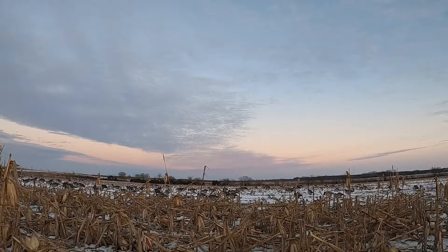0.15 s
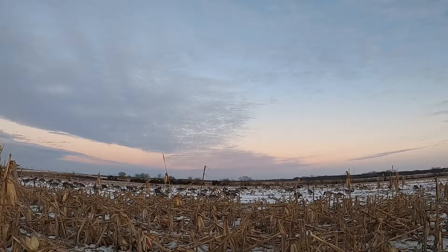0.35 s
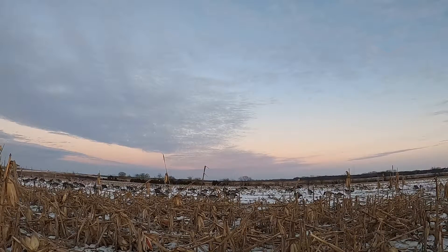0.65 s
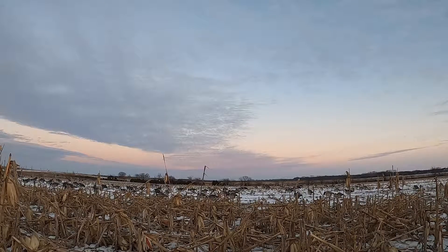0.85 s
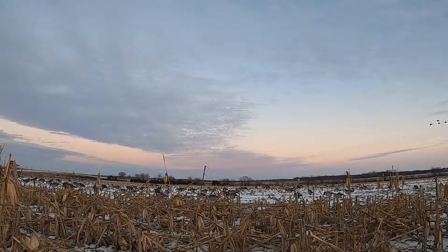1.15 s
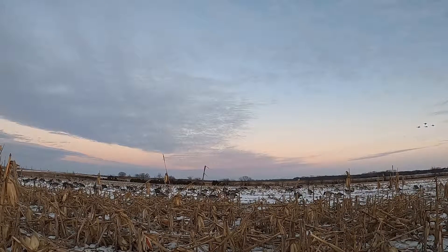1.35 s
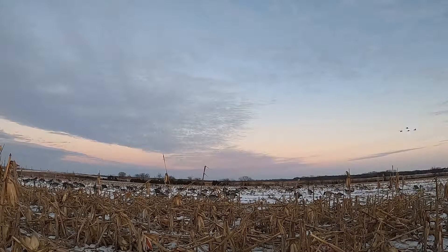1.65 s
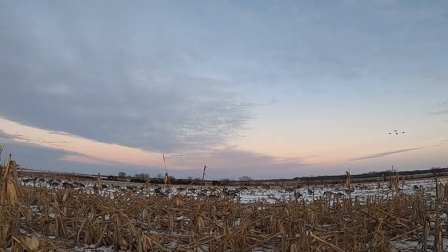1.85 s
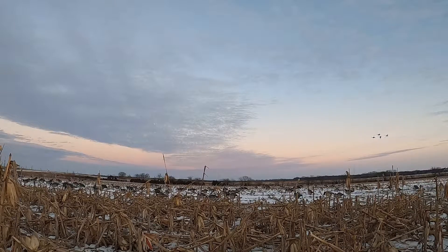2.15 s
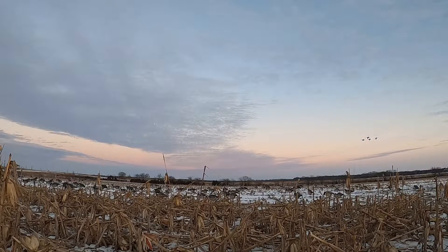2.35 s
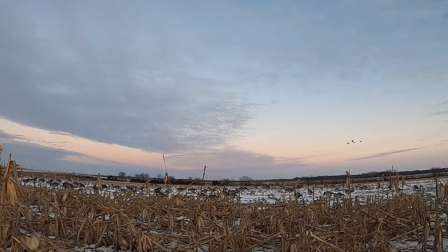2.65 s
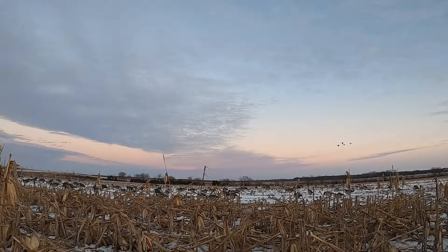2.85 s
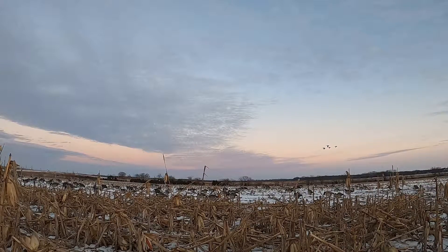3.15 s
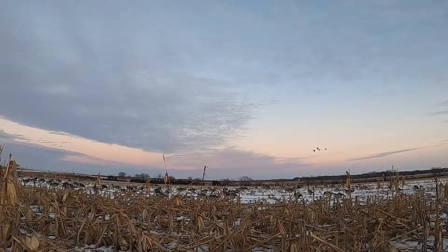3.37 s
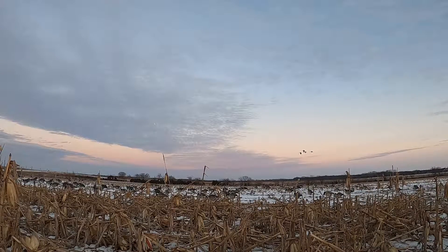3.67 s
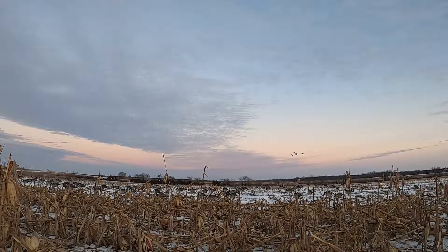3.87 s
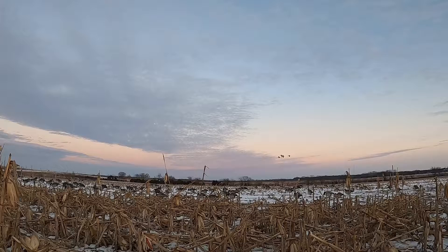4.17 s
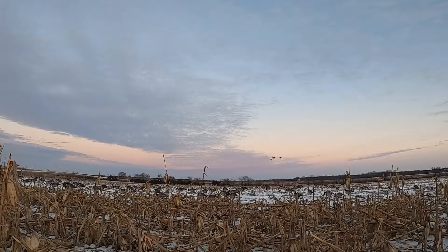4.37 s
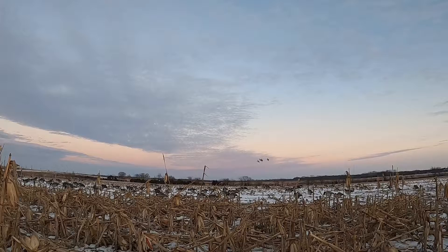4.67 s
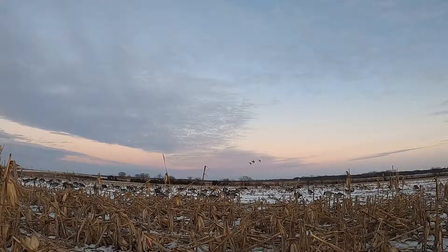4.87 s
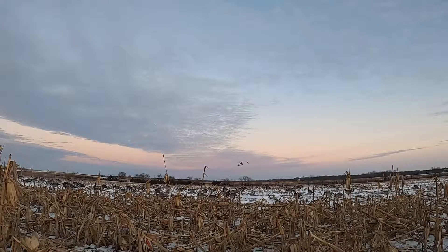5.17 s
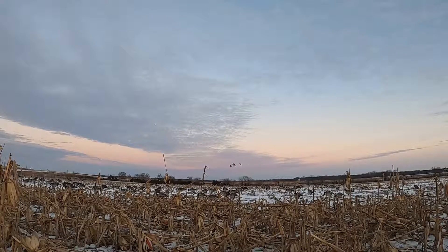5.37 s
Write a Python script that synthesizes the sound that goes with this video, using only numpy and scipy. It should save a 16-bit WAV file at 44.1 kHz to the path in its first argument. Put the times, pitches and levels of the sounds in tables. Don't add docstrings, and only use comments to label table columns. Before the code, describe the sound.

A windy stubble field with almost no reverberation, heard through a small camera's stereo microphone. Low gusts buffet throughout, with soft leaf hiss and thumping pops, mainly left, clustered around 0.3-0.7, 3.1 and 4.6-5.2 s. A distant tyre roar stays steady on the left; a very faint horn chord wavers and fades by 2 s. From 0.13 to 0.95 s a near goose, slightly left, holds a hoarse, buzzy moan, climbing slowly, loudest near 0.7, then sagging; another bird calls beneath at 0.2-0.4. A quieter gap follows, with a small stalk tick at 1.64. At 2.0 a brief growly moan leads to a dark honk at 2.1. Then chirp, rough growl and upward-breaking honk come at 2.8, 3.5, 4.1, 4.6 and 5.2, increasingly high, bright and strong, with faint murmurs between. A faint engine drones around 3.6-4.1; dry ticks sound near 2.5, 3.5 and 4.5. A short, highest honk at 5.48 is cut off by the end.

```python
import sys
import numpy as np
from scipy import signal
from scipy.fft import rfft, irfft, next_fast_len
from scipy.io import wavfile
from scipy.ndimage import uniform_filter1d, map_coordinates

SR = 44100
rng = np.random.default_rng(int(sys.argv[2]) if len(sys.argv) > 2 else 0)


def generate_wav(sig):
    pcm = np.round(np.clip(np.atleast_2d(sig).T, -1, 1) * 32767).astype(np.int16)
    wavfile.write(sys.argv[1], SR, pcm)


def voltage_ratio(decibels):
    exponent = np.asarray(decibels, float) / 20
    return 10 ** exponent


N = 243431
T = np.arange(N) / SR


def unit(x):
    return x / np.sqrt(np.mean(x ** 2) + 1e-20)


def along(points, hz):
    f, value = np.transpose(points)
    return np.interp(np.log(hz + 1), np.log(f + 1), value)


def curves(rows, t=T):
    s, *columns = np.transpose(rows)
    return [np.interp(t, s, column) for column in columns]


def wobble(rate, size=N):
    knots = rng.standard_normal(int(size * rate / SR) + 4)
    return map_coordinates(knots, [np.arange(size) * rate / SR])


def filtered(x, response):
    m = next_fast_len(N + 8192)
    return irfft(rfft(x, m) * response(np.fft.rfftfreq(m, 1 / SR)), m)[..., :N]


def rush(spectrum, alike, patchy_db):
    z = signal.stft(rng.standard_normal((2, N)), nperseg=512)[2]
    field = uniform_filter1d(rng.standard_normal(z.shape[1:]), size=5, axis=0)
    field = uniform_filter1d(field, size=10, axis=1)
    pair = signal.istft(z * voltage_ratio(patchy_db * unit(field)), nperseg=512)[1][:, :N]

    def mid_side(hz):
        turn = np.arccos(np.clip(along(alike, hz), -1, 1)) / 2
        return voltage_ratio(along(spectrum, hz)) * [np.cos(turn), np.sin(turn)]

    mid, side = filtered(pair, mid_side)
    return unit(np.array([mid + side, mid - side]))


# t/s, level/dB
GUSTS = [(0, -39), (.2, -43), (.44, -33.5), (.64, -40), (1.1, -42), (1.86, -39), (2.14, -37.5),
         (2.55, -41.5), (3.01, -37), (3.5, -42.5), (3.67, -39), (3.92, -41.5), (4.61, -40.5), (4.81, -37),
         (5, -41.5), (5.4, -38.5), (5.52, -42)]
# f/Hz, level/dB per Hz
BUFFET_SPECTRUM = [(12, -32.5), (20, 1), (39, 0), (80, -2), (251, -28), (320, -32), (420, -44), (700, -120)]
# f/Hz, left-right likeness
BUFFET_ALIKE = [(30, .32), (250, .6)]
# t/s, left peak level/dB, f/Hz, left minus right/dB, width/cycles
GUST_POPS = [(.318, -19, 67.7, 20, 0.52), (0.371, -22.5, 110, 13.5, 0.35), (0.458, -26, 110, 12.5, .4),
             (0.497, -13.5, 101, 20.5, 0.46), (.586, -23.5, 98.4, 10, 0.6), (.663, -27, 84, 19, .4),
             (1.212, -19.5, 77.6, 22, 0.48), (1.468, -29.5, 72.4, 11, 0.81), (2.64, -29, 73.8, -2, 0.65),
             (3.072, -17, 119, 11, 0.35), (3.088, -14, 102.6, 23, 0.49), (3.134, -23.5, 67.5, 14, 1),
             (3.245, -21, 69, 16, 0.45), (4.054, -22.5, 75, 14, .5), (4.634, -22.5, 70, 20, 0.54),
             (4.751, -15, 79.13, 12, 0.44), (4.763, -14, 100, 17, 0.28), (4.846, -24, 64, 9, 0.53),
             (4.963, -19, 76, 23, 0.65), (5.192, -20, 106, 16, 0.4)]
# f/Hz, level/dB per Hz
HISS_SPECTRUM = [(2500, -33.5), (4000, -1), (7500, -3.5), (8000, -10.5), (8400, -25.5), (20000, -41)]


def wind():
    buffet_db, = curves(GUSTS)
    leaves_db, leaves_swing = -84, 0.88
    rustle_db = leaves_db + leaves_swing * (buffet_db - buffet_db.mean())
    lumps = voltage_ratio(1.8 * wobble(6.01) + 2.5 * np.array([wobble(14), wobble(8.7)]))
    buffet = unit(lumps * rush(BUFFET_SPECTRUM, BUFFET_ALIKE, patchy_db=0.5))
    out = voltage_ratio(buffet_db + 6.0 + [[2.5], [-2.5]]) * buffet
    for s, db, hz, left_db, cycles in GUST_POPS:
        u = (T - s) * hz
        swing = np.cos(2 * np.pi * u) + 0.21 * np.cos(2 * np.pi * 2.12 * u)
        pop = voltage_ratio(db) * swing * np.exp(-.5 * (u / max(cycles, .2)) ** 2)
        out += pop * voltage_ratio([[0], [-left_db]])
    leaves = rush(HISS_SPECTRUM, [(4000, .1)], patchy_db=2.0)
    return out + voltage_ratio(rustle_db + 1.1 * wobble(35)) * leaves


# f/Hz, level/dB per Hz
ROAR_SPECTRUM = [(150, -42), (260, -12), (400, -7), (650, -2), (960, 0), (1400, -6.5), (1950, -13),
                 (2500, -22.5), (3100, -28.5), (3800, -39), (4800, -48.5), (6500, -87)]
# f/Hz, left-right likeness
ROAR_ALIKE = [(60, 0.54), (160, 1), (430, 0.87), (1150, 0.49), (3080, 0.18), (8230, 0.15)]
# f/Hz, left minus right/dB
ROAR_LEFT = [(60, 4.0), (160, 2.1), (430, 1.9), (1150, 10.35), (3080, 12.4), (8230, 2.0)]
# f/Hz, level/dB
HORN_CHORD = [(322, -58.5), (373, -60), (432, -56), (497, -58)]
# t/s, level/dB
HORN_LEVEL = [(0, 2), (.6, -6), (1.25, 2.5), (1.35, -2.5), (2, -12), (2.2, -46)]
# t/s, f/Hz, level/dB
ENGINE = [(3.45, 190, -75), (3.6, 193.1, -60), (3.95, 193.6, -51), (4.1, 192.3, -62.5)]


def traffic():
    roar = rush(ROAR_SPECTRUM, ROAR_ALIKE, patchy_db=1.5)
    roar = filtered(roar, lambda hz: voltage_ratio(np.array([[.5], [-.5]]) * along(ROAR_LEFT, hz)))
    roar_db = -46 + 0.2 * wobble(6.7) + 1.3 * wobble(7)
    horn = sum(voltage_ratio(db + 2.5 + 0.97 * wobble(4.1)) * np.sin(2 * np.pi * hz * T) for hz, db in HORN_CHORD)
    engine_hz, engine_db = curves(ENGINE)
    turn = 2 * np.pi * np.cumsum(engine_hz) / SR
    drone = voltage_ratio(engine_db) * (np.sin(turn) + 0.65 * np.sin(2 * turn))
    return voltage_ratio(roar_db) * roar + voltage_ratio(curves(HORN_LEVEL)[0]) * horn + drone


def span(rows, edge=0.0032):
    part = slice(int(rows[0][0] * SR), min(N, int(rows[-1][0] * SR)))
    t = T[part]
    left = rows[-1][0] - t + 2 * edge * (part.stop == N)
    return part, t, np.clip(np.minimum(t - t[0], left) / edge, 0, 1)


def partials(hz, levels_db, flutter_db):
    size = hz.shape[1]
    phase = 2 * np.pi * np.cumsum(hz * (1 + 0.0022 * wobble(60, size=size)), axis=1) / SR
    flutter = np.array([flutter_db * wobble(21.14, size=size) + .5 * wobble(400, size=size) for _ in hz])
    flutter = flutter * (1 + hz / 5000)
    start = rng.uniform(0, 2 * np.pi, (len(hz), 1))
    return np.sqrt(2) * np.sum(voltage_ratio(levels_db + flutter) * np.sin(phase + start), axis=0)


def chirp(s, length, hz, db, bright_db):
    return [(s, hz, db - 8.5, bright_db - 4.5),
            (s + 0.15 * length, hz, db, bright_db),
            (s + length, hz * 1.05, db - 0.5, bright_db + 8)]


def honk(s, length, hz, db, bright_db):
    slack_hz, rest_db = 1259, -23
    extra = max(length - .125, 0)
    scoop = 0.0028 + 0.15 * extra
    return [(s, slack_hz, db, bright_db + 6),
            (s + scoop, hz * (1 - 0.27 * extra), db, bright_db + 1.5),
            (s + 0.59 * length, hz, db, bright_db + 1),
            (s + 0.72 * length, .993 * hz, db - 1.5, bright_db),
            (s + 0.91 * length, hz - .42 * (hz - slack_hz), db - 2, rest_db),
            (s + length, slack_hz, db - 17, rest_db)]


# t/s, length/s, second partial f/Hz, its level/dB, brightness/dB
CLEAR_HONKS = [
    (2.118, 0.14, 1366, -43.5, -33),
    (2.889, .168, 1393, -39, -28),
    (3.596, 0.15, 1440, -38.5, -29.5),
    (4.178, 0.12, 1447, -36.5, -31),
    (4.683, 0.11, 1487, -33, -16),
    (5.232, 0.124, 1496, -32, -18),
    (5.482, 0.084, 1638, -36.5, -19),
]
SHORT_CHIRPS = [
    (.095, 0.03, 1473, -47, -50),
    (2.785, 0.022, 1420, -45, -25.5),
    (3.5, .035, 1403, -45, -15),
    (4.105, 0.037, 1440, -43, -28.5),
    (4.603, 0.0225, 1449, -41, -24),
    (5.16, 0.042, 1490, -39.5, -19.5),
]
# t/s, second partial f/Hz, level/dB, brightness/dB
BRIEF_MOAN = [(2.015, 938, -55, -41.5), (2.028, 960, -40.5, -43), (2.042, 982, -45, -43),
              (2.058, 1012, -36.5, -46), (2.085, 1021, -40.5, -44), (2.102, 1010, -42, -45)]
SECOND_BIRD = [(.185, 1319, -37.5, -39), (.205, 1357, -37.5, -36), (.25, 1376, -35.5, -34),
               (.3, 1407, -38, -39.5), (.36, 1402, -37, -30), (.39, 1365, -39.5, -35),
               (.42, 1315, -39, -40), (.44, 1292, -51, -42.5)]
FAINT_NOTES = [
    [(5.035, 1386, -59, -43), (5.048, 1455, -47.5, -45), (5.075, 1395, -47, -45)],
    [(5.072, 1379, -47, -38), (5.086, 1333, -41.5, -40), (5.105, 1277, -45, -40), (5.13, 1260, -56, -40)],
    [(5.352, 1410, -52, -45), (5.366, 1380, -50, -45), (5.386, 1370, -51, -45), (5.4, 1300, -60, -45)],
]
# multiple of the first partial, level/dB
HONK_PARTIALS = [(1, -5.5), (2, 2.5), (3, -16), (4, -22), (5, -21), (6, -25), (7, -38.5), (8, -46.5),
                 (9, -47), (10, -46.5), (11, -61), (12, -65.5), (13, -73.5), (14, -74.5), (15, -66.5)]
# third, fourth, fifth, sixth, higher partials, level/dB each
BIRD_THROATS = [(-4.0, -5, 0, -0.5, 1.5), (-1.5, -2, 1, 0.5, 3), (1, 1, -0.5, -4, 1),
                (-3, 1.0, -3, -7, 1.5), (-2, 1, 0.5, -3.5, -0.5), (3, -4, -2, 2, 2),
                (0, 2.5, -2.5, -3, -2.5)]
# f/Hz, level/dB
CAVITIES = [(1500, 0), (2150, 3), (2760, -8), (2885, 2.5), (3000, -4), (4200, -1), (6300, 1.5), (9000, 0)]
# t/s, level/dB
FLOCK_NEARING = [(0, -8), (2.2, -7), (3, -7), (3.6, 2), (5.5, 1)]


def honks():
    out = np.zeros(N)
    order, order_db = np.transpose(HONK_PARTIALS)[..., None]
    lift = np.interp(order, [1, 2, 4, 5, 6, 8, 12], [-0.24, 0.018, 0.24, 0.95, 0.86, 0.71, 0.48])
    # turning points, then dB on the first, the top and the third partials
    notes = [(honk(*row), 0, 0, 0) for row in CLEAR_HONKS]
    notes += [(chirp(*row), 8, -5, 0) for row in SHORT_CHIRPS]
    notes += [(BRIEF_MOAN, -25.5, 3.0, 0), (SECOND_BIRD, -3.5, 1.0, -6.0)]
    notes += [(rows, -4.0, -3.0, -5.0) for rows in FAINT_NOTES]
    throats = BIRD_THROATS + [5 * (0,)] * len(notes)
    for (rows, low_db, top_db, third_db), throat in zip(notes, throats):
        part, t, fade = span(rows, 0.0067 if len(rows) == 3 else 0.009)
        second_hz, db, bright_db = curves(rows, t)
        highest_hz = second_hz.max()
        hz = order * second_hz / 2
        opening = np.clip(bright_db + 29, -15, 16)
        sag = 1 - second_hz / highest_hz
        sag_db = -62 * (order - 2).clip(0) * sag - 50 * (order == 1) * sag
        notch_db = -9.5 * np.exp(-((hz - 5600) / 150) ** 2)
        low_db = low_db - 0.0324 * (highest_hz - 1489)
        voice_db = np.interp(order, range(2, 8), (0, *throat))
        voice_db = voice_db + (order == 1) * low_db + (order == 3) * third_db
        voice_db = voice_db + (order > 6) * (top_db + curves(FLOCK_NEARING, t[0])[0])
        voice_db = voice_db + along(CAVITIES, order * highest_hz / 2)
        levels_db = order_db + db + lift * opening + voice_db + sag_db + notch_db
        unsteady_db = 4.5 * (t[-1] - t[0])
        out[part] += fade * partials(hz, levels_db, flutter_db=unsteady_db)
    return out


# t/s, second partial f/Hz, its level/dB
LONG_NOTE = [
    (.125, 926, -41),
    (.157, 910, -32),
    (.275, 949.5, -29.5),
    (.399, 958.4, -31),
    (.439, 983.6, -26.5),
    (.71, 1018, -22.5),
    (.885, 1025, -25),
    (.931, 974, -32.5),
    (.955, 887, -51),
]
# multiple of the first partial, level/dB
MOAN_PARTIALS = [(1, -25), (2, -0.5), (3, -16), (4, -29), (5, -24), (6, -29.5), (7, -41.5), (8, -48.5),
                 (9, -40), (10, -53), (11, -53.5), (12, -64.5), (13, -64.5), (14, -74.5), (15, -64.5),
                 (16, -79.5)]
# offset/quarters of the pitch, level/dB
SIDE_LINES = [(1, -17.5), (2, -19.5), (-1, -23.5)]
# multiple, rise above it/dB, rise below it/dB
SIDE_RISE = [(1, 5.5, 6.5), (2, -8, -13.5), (3, -13.5, 1), (4, 10, 14.5), (5, 3, 9), (6, 6.5, 9.5),
             (7, 4, 10), (8, 5.5, 11.5), (9, 2.5, 6), (10, 5, 7.5), (16, 7, 11.5)]
# highest second partial so far f/Hz, level/dB
HOARSENESS = [(911, -5), (955, 9.5), (985, 5.5), (1013, -2)]
# highest second partial so far f/Hz, level/dB
EARLY_THIRD = [(930, 4), (950, 2.5), (965, 7), (990, 0)]


def moan():
    out = np.zeros(N)
    order, order_db = np.transpose(MOAN_PARTIALS)[..., None]
    part, t, fade = span(LONG_NOTE)
    second_hz, db = curves(LONG_NOTE, t)
    highest_hz = np.maximum.accumulate(second_hz)
    hoarse_db = along(HOARSENESS, highest_hz)
    beat_hz = second_hz / 8
    opening_db = np.clip(3 * (highest_hz - 1023.3), -15, 6)
    order_db = order_db + opening_db * np.interp(order, [4.8, 6.3, 10, 5.8], [0.028, 0.0, 0, 0.13])
    order_db = order_db - 22 * (order - 3).clip(0) * (1 - second_hz / highest_hz)
    third_db = (order == 3) * along(EARLY_THIRD, highest_hz)
    hz = order * second_hz / 2
    tone = partials(hz, order_db + db + third_db, flutter_db=0.95)
    multiple, above_db, below_db = np.transpose(SIDE_RISE)
    for step, step_db in SIDE_LINES:
        rise_db = np.interp(order, multiple, above_db if step > 0 else below_db)
        side_db = order_db + rise_db + step_db + db + hoarse_db
        tone += partials(hz + step * beat_hz, side_db, flutter_db=2.5)
    out[part] = fade * tone
    return out


def ring(hz, swell, t):
    return (t / swell) ** 2 * np.exp(2 - 2 * t / swell) * np.sin(2 * np.pi * hz * t)


# t/s, length/s, throat level/dB, rasp level/dB, throat f/Hz
CHIRP_GROWLS = [
    (2.795, .065, -32, -58.5, 937),
    (3.52, .055, -33, -54, 1023),
    (4.123, .048, -30, -52, 1154),
    (4.618, .05, -32.5, -52.5, 1152),
    (5.18, .04, -33.5, -49, 1217),
    (5.428, .05, -35, -52.5, 1195),
]
# share of length, throat level/dB, rasp level/dB, pitch factor
CHIRP_GROWL_SHAPE = [(0, -7, -5.5, 1), (.3, -10, -4.5, 1.02), (.6, -8.5, -12.5, 1.2), (1, -4.5, -11.5, 0.9)]
# t/s, length/s, throat level/dB, rasp level/dB, throat f/Hz
BREAKS = [
    (2.86, .055, -32, -53.5, 1046),
    (3.568, .05, -29.5, -52, 1014),
    (4.163, .038, -32, -53, 1053),
    (4.66, .045, -31.5, -50.5, 1110),
    (5.212, .04, -36.5, -48, 1228),
    (5.462, .035, -33.5, -52, 1250),
]
# share of length, throat level/dB, rasp level/dB, pitch factor
BREAK_SHAPE = [(0, -2.5, -15, 1.1), (.3, -0.5, -11, 1.114), (.45, 0.5, -0.5, 1.13), (.75, -7, 0.5, 1.2),
               (1, -14, -8, 1.27)]
# t/s, length/s, throat level/dB, rasp level/dB, throat f/Hz
LONE_GROWLS = [
    (.125, .095, -36, -64.5, 1007),
    (1.964, .05, -37.5, -73, 1035),
    (2.035, .068, -39.5, -63, 1050),
    (2.1, .09, -43.5, -71, 1261),
    (3.905, 0.1, -46.5, -69.5, 1072),
    (4.508, 0.037, -38, -56, 1206),
    (5.072, 0.054, -36, -54, 1330),
    (5.329, 0.085, -45.5, -66, 1316),
]
# share of length, throat level/dB, rasp level/dB, pitch factor
LONE_SHAPE = [(0, -4, -11.5, 1.2), (.3, -2.5, 0.5, 1.04), (.6, -4, -3, 1), (1, -8, -12, .96)]
# beats a second, roughness 0-1, beak f/Hz
GROWL_BEATS = [(167.74, 0.2, 3550), (181.2, 0.6, 3660), (180, 0.3, 3700), (190, 0.7, 3500),
               (186, 0.5, 4000), (190, 0.5, 4200), (182, .12, 3700), (200, .2, 3800), (204, .25, 3500),
               (209, .3, 3700), (210, .3, 4000), (200.4, 0.6, 4200), (152, 0.5, 3600), (163.6, .6, 3600),
               (169.5, 0.5, 3650), (171.7, 0.6, 3500), (174.3, 0.97, 3900), (162, .6, 2400),
               (174, .2, 4250), (184, 0.6, 3800)]
# share of the beak's f, level/dB, swell/s
BEAK_MODES = [(0.925, 0.5, 0.000575), (1.14, -9.5, 0.00094), (0.804, -10.5, 0.00098), (.7, -13.5, 0.00061),
              (.55, -1, 0.00055), (2, -29.5, .0002)]


def growls():
    out, t = np.zeros(N + 600), np.arange(600) / SR
    calls = [(row, CHIRP_GROWL_SHAPE) for row in CHIRP_GROWLS]
    calls += [(row, BREAK_SHAPE) for row in BREAKS]
    calls += [(row, LONE_SHAPE) for row in LONE_GROWLS]
    slowing = [0] * (len(CHIRP_GROWLS) + len(BREAKS)) + [.75] * len(LONE_GROWLS)
    for (call, shape), slows, (hz, rough, beak_hz) in zip(calls, slowing, GROWL_BEATS):
        start, length, peak_db, beak_db, pitch_hz = call
        rows = np.array(shape) * [length, 1, 1, pitch_hz] + [start, peak_db, beak_db, 0]
        begin, end = rows[0][0], rows[-1][0]
        times = np.arange(begin, end, 1 / hz)
        times = times + slows * (times - start) ** 2
        chance = np.clip(rough, 0, 1) * rng.standard_normal((40, 3))[:len(times)]
        times = times + .12 / hz * chance[:, 0]
        beak = sum(voltage_ratio(db) * ring(share * beak_hz, swell, t) for share, db, swell in BEAK_MODES)
        for s, throat_db, rasp_db, throat_hz, (_, size, slip) in zip(times, *curves(rows, times), chance):
            puff = rough * 0.19 * voltage_ratio(-60 * t / 0.031) * rng.standard_normal(600) + (t == 0)
            throat = ring(throat_hz * (1 + 0.07 * slip), 0.0016, t)
            body = voltage_ratio(throat_db + 4.5) * throat + voltage_ratio(rasp_db + 10.5) * beak
            beat = signal.fftconvolve(puff, body)[:600]
            fade = min(1, 0.067 + (s - begin) / 0.0097, 0.33 + (end - s) / 0.012)
            out[int(s * SR):][:600] += voltage_ratio(2.7 * size) * fade * beat
    return out[:N]


# t/s, peak level/dB, decay by 60 dB/s
STALK_TICKS = [(1.641, -62, 0.04), (1.646, -68, 0.44), (2.503, -66, 0.033), (2.52, -60.5, 0.037),
               (2.708, -68.5, 0.064), (3.512, -55, 0.033), (4.114, -66, .12), (4.186, -60, .05),
               (4.455, -68.5, 0.3), (4.476, -56, 0.082), (4.52, -66, 0.06)]
# f/Hz, level/dB
STALK_SPECTRUM = [(1500, -29), (3000, 4), (5500, -7.5), (8000, -12), (12000, -32.5), (16000, -72)]


def stalks():
    out, t = np.zeros(N + 12000), np.arange(12000) / SR
    for s, db, t60 in STALK_TICKS:
        crackle = rng.standard_normal(len(t)) * voltage_ratio(4.5 * wobble(500, size=len(t)))
        decay = voltage_ratio(db + 5.5 - 60 * t / max(t60, .003))
        out[int(s * SR):][:len(t)] += decay * (1 - np.exp(-t / 0.0013)) * crackle
    return filtered(out[:N], lambda hz: voltage_ratio(along(STALK_SPECTRUM, hz)))


def placed(x, left_db, lead, echo_db, hiss_db):
    loudness = np.sqrt(np.abs(uniform_filter1d(x ** 2, size=900)))
    x = x + voltage_ratio(hiss_db) * loudness * rush(HISS_SPECTRUM, [(4000, 0.97)], patchy_db=5.5)[0]
    f, radians = np.transpose(lead)
    ports = np.array([[1], [-1]])
    direct = filtered(np.array([x, x]), lambda hz: np.exp(.5j * ports * np.interp(hz, f, radians)))
    tail = rng.standard_normal((2, 5000)) * voltage_ratio(-60 * T[:5000] / 0.042)
    echo = signal.fftconvolve(x[None], tail / np.linalg.norm(tail[0]), axes=1)[:, :N]
    return direct * voltage_ratio(ports * left_db / 2) + voltage_ratio(echo_db) * echo


# f/Hz, lead/radians
NEAR_PHASE = [(0, 0.039), (2500, 0.029), (5000, .4), (6500, 0.024)]
# f/Hz, lead/radians
FLOCK_PHASE = [(0, 0), (950, -0.44), (1400, -0.37), (3700, -1.1), (5100, -1), (6000, -0.024), (9000, -.2)]


def scene():
    near = placed(moan(), left_db=4.0, lead=NEAR_PHASE, echo_db=-21.0, hiss_db=-59.5)
    flock = placed(honks() + growls(), left_db=-2.5, lead=FLOCK_PHASE, echo_db=-11.0, hiss_db=-46.5)
    return near + flock + stalks() + wind() + traffic()


def band_limit(x):
    return signal.sosfilt(signal.butter(12, 12600, fs=SR, output="sos"), x)


def record(dry):
    cut = filtered(dry, lambda hz: 1j * hz / (24 + 1j * hz))
    fade = np.clip(np.minimum(T, T[-1] - T + .001) / 0.002, 0, 1)
    return band_limit(cut * fade)


dry = scene()
out = record(dry)
generate_wav(out)
```